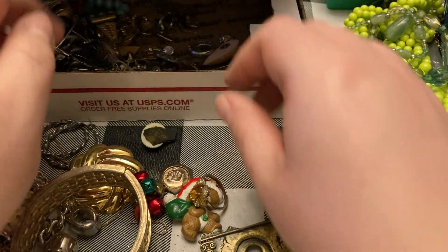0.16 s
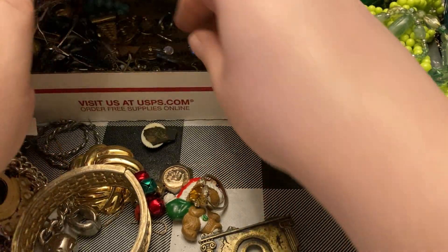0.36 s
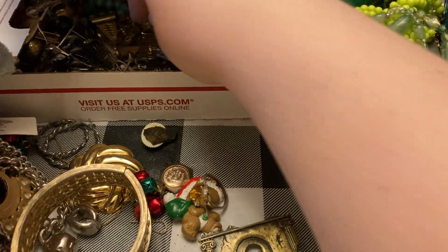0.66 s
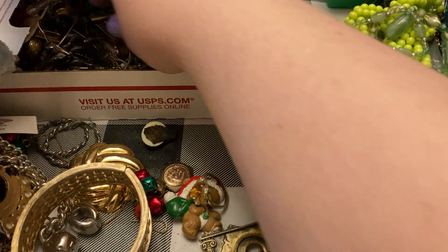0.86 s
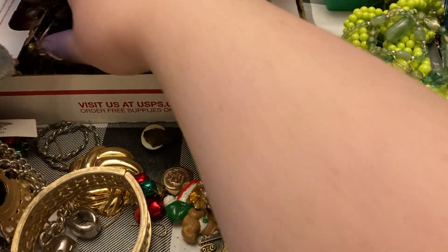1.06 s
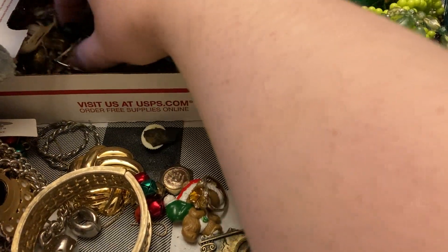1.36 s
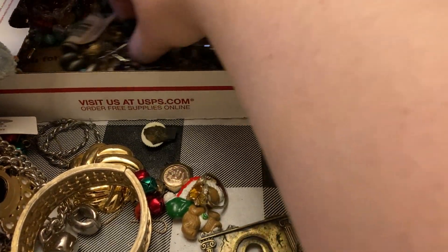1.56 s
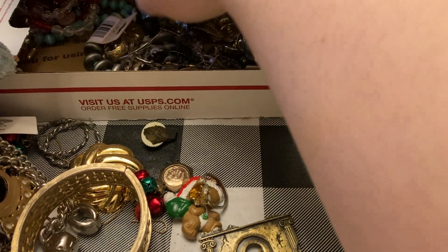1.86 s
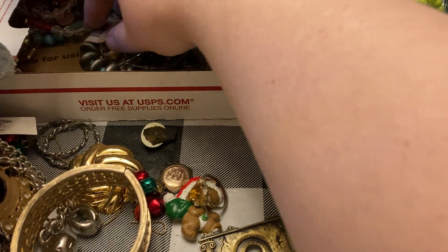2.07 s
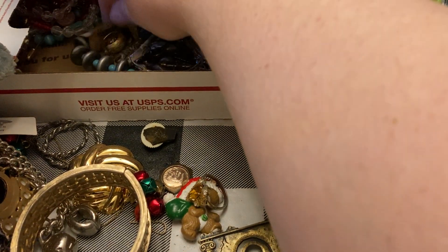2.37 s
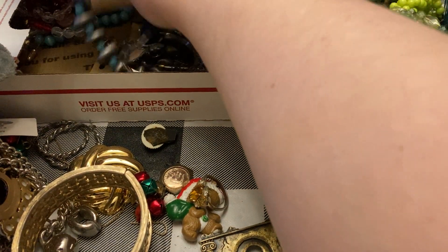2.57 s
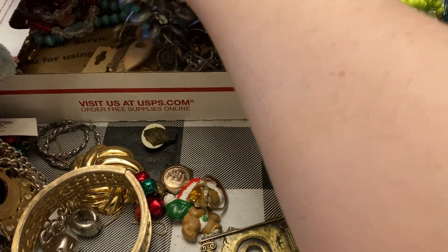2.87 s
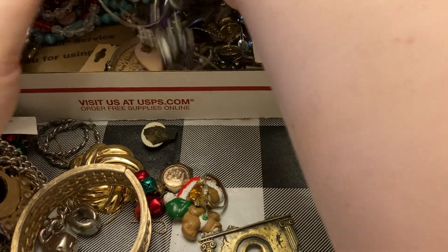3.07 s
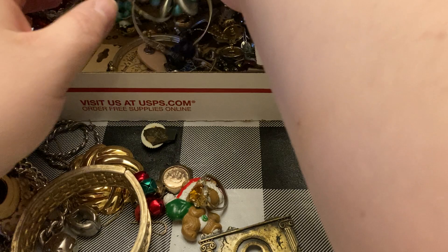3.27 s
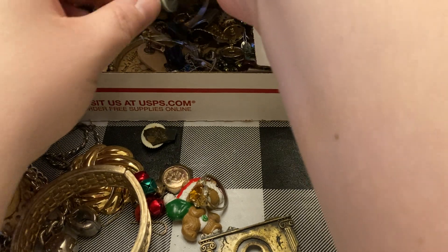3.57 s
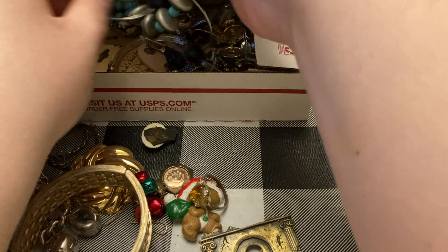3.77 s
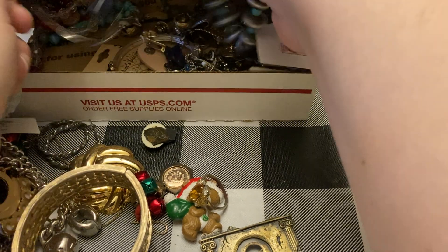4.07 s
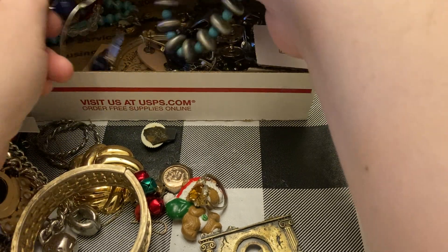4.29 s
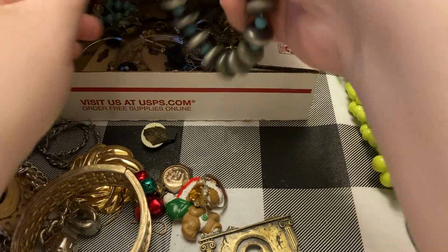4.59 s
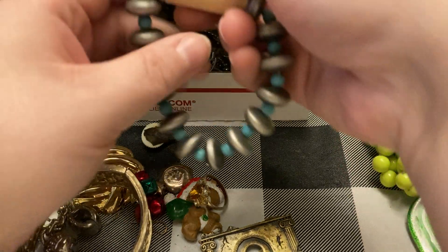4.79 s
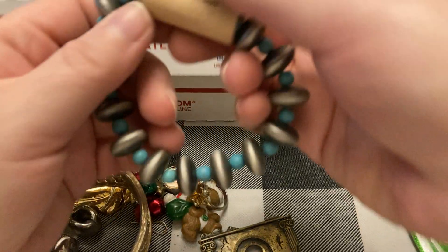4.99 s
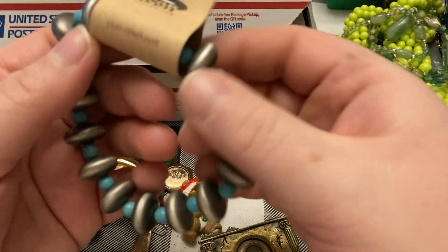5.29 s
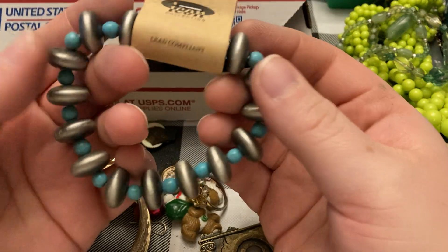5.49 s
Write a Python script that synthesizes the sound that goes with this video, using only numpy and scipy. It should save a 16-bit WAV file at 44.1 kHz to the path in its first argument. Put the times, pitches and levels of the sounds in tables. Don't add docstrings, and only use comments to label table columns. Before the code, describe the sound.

A phone close to a table, in a quiet room with faint low hum. At about 0.25 s a dull bump of the table and a brush of skin on cardboard, then soft rubbing until 0.8 s. The hand dives into a cardboard box of beads, chains and tags: clicks and scrapes thicken, with a strong rush of sliding pieces around 1.2 to 1.7 s. Hollow cardboard tocks stand out near 1.8 and 2.0 s. From 2.0 to 3.0 s there is a steady, glittering stir of clacks, link snaps and tiny high rings. The sharpest clatter lands near 3.1 s. From 3.3 s a loose disc chatters ever faster to rest while the digging thins. A knock and thump at 4.1 to 4.2 s lead to another rattling burst at 4.4 to 4.7 s. After 5 s only light touches remain, beads turning faintly in the fingers until 5.6 s.

```python
import sys
import numpy as np
from scipy import signal
from scipy.fft import rfft, irfft, next_fast_len
from scipy.io import wavfile
from scipy.ndimage import uniform_filter1d, map_coordinates

SR = 44100
rng = np.random.default_rng(int(sys.argv[2]) if len(sys.argv) > 2 else 0)


def wav_record(signal):
    frames = np.transpose(np.atleast_2d(signal))
    bounded = np.clip(frames, -1, 1)
    quanta = np.round(bounded * 32767).astype(np.int16)
    wavfile.write(sys.argv[1], SR, quanta)


def volts_from_decibels(level):
    exponent = np.asarray(level, float) / 20
    return 10 ** exponent


N = 248812
PALM_OFF_S = 0.84

# (frequency [Hz], rms level [dB])
HUM = [(119.5, -59.5)]
# (time [s], level [dB])
ROOM_FADE = [
    (0, 3),
    (5.0, -1.5),
    (5.3, -4.5),
    (5.64, -9.5),
]
# (time [s], peak [dB], sway [dB], slap [dB], slap pitch [Hz])
THUMPS = [(0.256, -17, -9, -27, 497), (0.493, -42.5, -5, 14, 384), (0.74, -35, -33, -32, 213),
          (1.235, -34.5, -7, -6, 490), (2.564, -30, 5, 19.5, 297), (2.6705, -25.5, -3.5, 13.5, 274),
          (3.143, -25.5, -16, 11.5, 400), (3.454, -41.5, -13, 15.5, 250), (4.101, -23.5, -20, -1, 413),
          (4.203, -37.5, -31, 16, 286), (5.02, -35, -34, 5, 210)]
# (time [s], peak [dB], pitch [Hz], decay t60 [s])
KNOCKS = [(0.26, -21, 478, 0.0042), (0.933, -24.5, 835, 0.0083), (1.141, -34, 885, 0.0054),
          (1.158, -22.5, 780, 0.0075), (1.233, -40, 385, 0.0088), (1.229, -26, 950, 0.0093),
          (1.327, -29, 970, 0.02), (1.473, -21, 1060, 0.0053), (1.781, -18.5, 826, 0.0051),
          (1.937, -9, 876, 0.006), (1.988, -10.5, 907, 0.0054), (2.566, -23.5, 402, 0.021),
          (2.731, -32, 920, 0.008), (2.84, -29.5, 938, 0.014), (2.862, -26.5, 880, 0.011),
          (2.958, -33.5, 500, 0.0088), (3.019, -25, 806, 0.0018), (3.065, -25.5, 870, 0.0072),
          (3.089, -21.5, 764, 0.0029), (3.118, -28.5, 870, 0.017), (3.143, -22, 830, 0.0024),
          (3.194, -33.5, 795, 0.017), (3.216, -21.5, 920, 0.0093), (3.283, -23.5, 934, 0.0038),
          (3.454, -24, 1100, 0.0045), (4.088, -22.5, 767, 0.012), (4.097, -27, 1200, 0.0093),
          (4.095, -18, 833, 0.033), (4.205, -17, 880, 0.01), (4.694, -25.5, 1170, 0.0029)]
# (frequency [Hz], width [Hz], level [dB])
BOX_MODES = [(459, 144, 1.5), (892, 186, 4.5), (1390, 830, -5)]
# (frequency [Hz], level [dB])
DISC_PARTIALS = [(3550, -2.5), (4500, 0), (6800, 3)]
# (frequency [Hz], width [Hz], level [dB])
PALM_MODES = [(1580, 160, -1), (2180, 130, -4), (2620, 120, -2), (4250, 200, -3), (5170, 100, -11)]
# (frequency [Hz], level [dB])
BEAD_TONE = [(1200, -8), (1700, -2.5), (2500, 5), (3050, 2.5), (3950, 4.5), (5500, -5), (7000, -21.5)]
# (frequency [Hz], level [dB])
CHAIN_TONE = [(4500, -38), (6000, -1), (8500, -2.5), (10500, -1.5), (13000, -11.5), (15700, -16),
              (16200, -43)]
# (time [s], peak [dB], sparkle over it [dB],
# pitch [Hz])
LINK_SNAPS = [(0.6799, -53, -14, 4290), (0.854, -39, -3, 2200), (0.8763, -31, -3, 3530),
              (0.9908, -42, -7, 1570), (1.1078, -39, -8, 1870), (1.1812, -33, -14, 2090),
              (1.234, -23, -4, 2430), (1.2563, -33, 4, 2500), (1.3911, -25, -12, 2500),
              (1.475, -23, -9, 2650), (1.6998, -30, 0, 1570), (1.7229, -35, 0, 2760),
              (1.7895, -31, 0, 3380), (2.0407, -45, 7, 3730), (2.0837, -43, 5, 2330),
              (2.1099, -42, 2, 4090), (2.1769, -37, 3, 3360), (2.1898, -39, 9, 2630),
              (2.2059, -37, -4, 2800), (2.2301, -29, -4, 4670), (2.2819, -38, 1, 3900),
              (2.322, -29, -5, 4520), (2.33, -30, -9, 2350), (2.4188, -33, -4, 2690), (2.428, -40, 6, 6220),
              (2.4435, -34, -8, 2760), (2.494, -33, -1, 2540), (2.6146, -45, 8, 4110),
              (2.6827, -34, -9, 2710), (2.7487, -32, -11, 4330), (2.8468, -31, 3, 4690),
              (2.889, -41, 6, 5210), (2.9108, -35, -8, 3680), (2.9378, -45, 4, 3700),
              (2.9599, -32, -3, 3680), (3.043, -42, 8, 3790), (3.0797, -35, 2, 4110),
              (4.0872, -44, 7, 3450), (4.111, -39, -5, 1960), (4.5562, -39, 2, 6090),
              (4.618, -38, -1, 4050), (4.626, -37, -4, 3980), (4.7065, -34, -7, 3510),
              (4.7181, -38, -4, 2910), (4.7705, -48, -9, 1740), (4.8594, -46, -9, 3850),
              (4.8754, -52, 3, 1810), (4.9054, -51, 4, 3880), (5.1088, -58, -11, 1770),
              (5.1622, -50, -7, 4460),
              (3.110, -31, -2, 2400), (3.131, -24, -6, 2300), (3.177, -27, -8, 2100),
                  (3.241, -36, -6, 2500), (3.301, -36, 0, 4500), (3.328, -50, 9, 4000),
                  (3.342, -50, 9, 4200), (3.361, -48, 8, 4000), (3.378, -48, 7, 4300),
                  (3.441, -46, 6, 4300), (3.468, -42, -8, 2000), (3.492, -48, 6, 4300),
                  (0.35, -52, -8, 2400), (0.55, -52, -10, 1700), (0.575, -52, -10, 1600)]
# (time [s], peak [dB], pitch [Hz], decay t60 [s])
PINGS = [(2.951, -33, 10800, .03), (3.005, -22, 10600, .05), (2.866, -38, 10300, .06),
         (2.050, -24, 11700, .012), (2.189, -30, 11500, .012), (2.65, -40, 6200, .05),
         (3.024, -38, 6200, .03), (2.481, -34, 2550, .05), (2.529, -28, 7950, .015),
         (4.206, -34, 1895, .07), (4.204, -24, 1300, .008), (4.098, -23, 420, .064),
         (4.098, -33, 1750, .03), (4.469, -34, 2490, .04), (1.794, -29, 900, .02), (3.301, -33, 900, .015),
         (0.263, -35, 600, .035), (1.68, -24, 1100, .04), (4.54, -32, 700, .03), (4.359, -30, 2560, .025),
         (4.422, -28, 8200, .015), (4.528, -34, 6000, .07), (4.421, -30, 900, .02), (4.658, -33, 600, .03),
         (4.707, -33, 1000, .03), (4.858, -47, 1000, .02), (4.878, -41, 950, .03), (4.905, -42, 1000, .03),
         (5.019, -41, 700, .03), (5.07, -44, 1000, .04), (1.695, -22, 1000, .03), (1.939, -24, 560, .025),
         (1.229, -22, 2100, .015), (0.991, -36, 800, .02), (5.233, -48, 7500, .012), (0.49, -40, 650, .03),
         (3.041, -32, 800, .015), (2.205, -32, 900, .02)]
# (time [s], peak [dB], sparkle [dB], ring pitch [Hz])
TICKS = [(0.2591, -37.5, -49, 1680), (0.8657, -30, -35, 3710), (1.159, -20, -44, 2190),
         (1.2377, -23, -33, 1940), (2.0511, -27.5, -28.5, 3350), (2.168, -32, -37, 3300),
         (2.2943, -20.5, -35, 4630), (2.3891, -24, -32, 2500), (2.4648, -33.5, -34, 2510),
         (2.5289, -23, -30, 3530), (2.702, -32, -36, 2880), (2.7262, -25.5, -46, 4100),
         (2.7931, -48, -36, 2570), (2.8626, -19, -40.5, 3500), (2.949, -29, -31, 5100),
         (2.9881, -29, -38, 2560), (3.0052, -34, -29, 3460), (3.1399, -11.5, -57, 2020),
         (3.1968, -23, -42.5, 2370), (3.2834, -22, -39, 3430), (3.6208, -37, -43.5, 1880),
         (3.6626, -45, -36.5, 4130), (3.8208, -36.5, -38.5, 5060), (3.9228, -35.5, -34, 4270),
         (4.1607, -43, -40, 3810), (4.2048, -28.5, -44, 1680), (4.4698, -31, -40, 2490),
         (4.594, -14, -29, 3750), (4.6955, -17, -38.5, 2860)]
# (time [s], peak [dB], sparkle [dB], ring pitch [Hz])
CLACKS = [(0.2967, -30, -43, 2300), (0.8425, -36.5, -60, 3860), (0.932, -31.5, -39.5, 3440),
          (1.0779, -36.5, -48, 2550), (1.289, -26, -43, 2140), (1.4132, -16, -25.5, 3400),
          (1.466, -16, -38.5, 3870), (1.6932, -16.5, -42.5, 1550), (1.7506, -28, -47.5, 3360),
          (1.937, -18.5, -44, 3930), (1.9881, -20, -39, 2330), (2.122, -37, -38.5, 3300),
          (2.2204, -22.5, -41.5, 2730), (2.414, -30, -38.5, 2750), (2.481, -28, -32.5, 2570),
          (2.6329, -33, -40, 3350), (2.7533, -26, -58, 4580), (3.024, -19.5, -33, 3800),
          (3.1284, -20.5, -37.5, 2020), (3.2167, -22.5, -41, 3670), (3.4195, -31.5, -56.5, 3120),
          (3.454, -29, -55, 1783), (3.8114, -44, -41, 5500), (3.9543, -27.5, -28.5, 4450),
          (4.096, -43.5, -37, 1650), (4.3795, -17, -35, 2410), (4.6556, -32, -42, 1880),
          (5.2325, -48.5, -54.5, 4780),
          (5.272, -47.5, -76, 2710),
    (5.485, -54, -64.5, 2590),
    (5.5582, -56, -68, 2520),
]
# (time [s], peak [dB], sparkle [dB], ring pitch [Hz])
SCUFFS = [(0.8954, -30, -37, 3580), (0.9812, -34, -49, 3560), (1.0932, -32, -45.5, 1810),
          (1.1412, -23.5, -48, 2000), (1.2237, -25, -54, 2030), (1.328, -19, -33, 2560),
          (1.7814, -24, -36, 3400), (2.019, -33, -47, 2600), (2.3149, -24.5, -34, 4640),
          (2.5815, -29, -40.5, 2700), (2.7736, -42, -40, 5600), (2.8389, -19, -28.5, 3640),
          (3.0663, -22, -32.5, 4070), (3.1173, -9.5, -27, 2360), (3.1534, -17, -30, 2320),
          (3.1614, -20, -29, 3890), (3.1698, -18.5, -44, 1920), (3.627, -36, -38.5, 2970),
          (3.7589, -44, -44.5, 4080), (4.3573, -22.5, -33, 2580), (4.4083, -37, -53, 3720),
          (4.4193, -17.5, -31, 2580), (4.4324, -28, -35, 4400), (4.5101, -22.5, -53, 2660),
          (4.5249, -21.5, -47, 2440), (4.543, -30, -42, 4830), (5.1384, -33, -46, 2730)]
# (time [s], effort [dB], pressure on the cardboard [dB])
EFFORT = [(0.019, -44, 3), (0.044, -67, -1.5), (0.836, -67, -1.5), (0.849, -47, 4.5), (1.03, -55.5, 6),
          (1.539, -29.5, 0), (1.699, -37, 9.5), (1.759, -50.5, 8), (1.92, -71.5, -2), (2.0, -51.5, 5),
          (2.269, -44.5, -12), (3.05, -47.5, 0), (3.38, -58.5, 3), (4.33, -68.5, -10), (4.43, -51.5, -3.5),
          (4.71, -48.5, 3.5), (5.05, -71.5, 7.5), (5.64, -85.5, -7)]
# (peak time [s], fade, or minus the swell of a drag that stops short [s],
# beads [dB], cardboard over beads [dB], chains over beads [dB])
SHOVES = [(0.12, -0.12, -60, -12, -6), (0.165, -0.066, -53.5, 2, -2), (0.352, .06, -60, -4, -4),
          (0.57, -0.12, -59, -3, -8), (4.125, .1, -66, -10, 13), (5.075, .05, -66, 17, -8),
          (3.4, .3, -70, -10, 14), (0.282, .1, -60, 12.5, 6.5), (0.492, -0.078, -50, 5.5, -3.5),
          (.745, -0.098, -54.5, -1, -6), (1.237, 0.023, -32.5, 10.5, -2.5), (1.29, 0.32, -42.5, 6, -1),
          (1.797, 0.028, -40, 5.5, 1.5), (1.942, 0.047, -73, 21.5, -10), (2.006, 0.16, -60.5, 21.5, -6.5),
          (2.215, 0.065, -43.5, 6, 7.5), (2.854, 0.044, -44, -1.5, 7), (3.14, 0.13, -39, 6.5, 1),
          (3.296, 0.041, -51, 13.5, 11), (3.66, -0.098, -47.5, -39, -5), (3.75, 0.48, -57.5, -29.5, -1.5),
          (4.065, -0.36, -59, -0.5, 3.5), (4.103, 0.063, -66.5, 31, 16), (4.212, 0.15, -60.5, 10, 6),
          (4.425, 0.078, -38.5, -3, -0.5), (4.528, 0.13, -42.5, 4, 4.5), (4.959, -0.15, -57, 2.5, 2.5),
          (5.03, .1, -76, 26.5, -11), (5.154, 0.076, -60.5, -2, 0), (5.42, -0.23, -66, -8, 8)]
# (frequency [Hz], likeness [0-1])
PORT_LIKENESS = [(100, .985), (1000, .86), (1800, .68), (2800, .5), (4300, .75), (5400, .35), (7800, .88),
                 (16000, .9)]
# (frequency [Hz], left minus right [dB])
PORT_BALANCE = [(200, 1), (700, .8), (1300, -3.3), (2800, -3.3), (4200, 0), (5500, 2.5), (7000, 0)]
# (frequency [Hz], right leads by [rad])
PORT_LEAD = [(0, 0), (1500, 0), (3100, 1.7), (4200, .4), (5000, .6), (6400, 3.1), (8150, 0), (16300, -15.7)]


def unit(x):
    return x / np.sqrt(np.mean(x ** 2) + 1e-20)


def along(points, hz):
    f, v = np.transpose(points)
    return np.interp(np.log(hz + 1), np.log(f + 1), v)


def curves(rows):
    s, *cols = np.transpose(rows)
    return [np.interp(np.arange(N) / SR, s, c) for c in cols]


def wobble(rate):
    knots = rng.standard_normal(int(N * rate / SR) + 4)
    return map_coordinates(knots, [np.arange(N) * rate / SR])


def filtered(x, response):
    m = next_fast_len(N + 8192)
    return irfft(rfft(x, m) * response(np.fft.rfftfreq(m, 1 / SR)), m)[..., :N]


def modes(rows):
    def response(f):
        return sum((-1) ** k * volts_from_decibels(db) * 1j * f * width / (hz * hz - f * f + 1j * f * width)
                   for k, (hz, width, db) in enumerate(rows))
    return response


def bead_tone(f):
    return volts_from_decibels(along(BEAD_TONE, f))


def chain_tone(f):
    return volts_from_decibels(along(CHAIN_TONE, f))


def hiss(response, patchy_db=0):
    noise = rng.standard_normal((2, N))
    if patchy_db:
        field = rng.standard_normal((257, -(-N // 256) + 1))
        field = uniform_filter1d(uniform_filter1d(field, 3, 0), 12, 1)
        bands = signal.stft(noise, nperseg=512)[2] * volts_from_decibels(patchy_db * unit(field))
        noise = signal.istft(bands, nperseg=512)[1][:, :N]
    return unit(filtered(noise, response))


def swell(t, t60, rise):
    return (1 - np.exp(-(t / rise) ** 2)) * volts_from_decibels(-60 * np.clip(t - rise, 0, None) / t60)


def strike(hz, t60, rise, t):
    phase = np.array([[0], [rng.uniform(0, 2 * np.pi)]])
    return swell(t, t60, rise) * np.sin(2 * np.pi * hz * t + phase)


def add(track, s, burst):
    part = track[:, max(round(s * SR), 0):][:, :burst.shape[1]]
    part += burst[:, :part.shape[1]]


def room(effort_db):
    rumble_db, tremble_db = -61.5, -25
    calm_db = curves(ROOM_FADE)[0]
    t = np.arange(N) / SR
    hum = 0
    for hz, db in HUM:
        level = np.sqrt(2) * volts_from_decibels(db + 3 * wobble(9))
        hum = hum + level * np.sin(2 * np.pi * hz * t + 1.3 * wobble(7))
    rumble = volts_from_decibels(rumble_db + 3 * wobble(4)) * hiss(modes([(72, 72, 0)]))
    tremble = volts_from_decibels(effort_db + tremble_db) * hiss(modes([(210, 26, 0)]))
    return volts_from_decibels(calm_db) * (hum * [[1], [0]] + rumble) + tremble


def thumps():
    t = np.arange(SR // 4) / SR
    out, shake = np.zeros((2, 2, N))
    t60 = 0.19
    for s, db, sway_db, slap_db, slap_hz in THUMPS:
        slap = strike(slap_hz, 0.016, 0.0049, t)
        boom = strike(130.3, 0.5 * t60, 0.0026, t) + 0.52 * strike(200, 0.68 * t60, 0.0061, t)
        sway = strike(85.8, 0.56 * t60, 0.0043, t) + 0.37 * strike(67.5, t60, 0.0092, t)
        add(out, s - 0.001, volts_from_decibels(db + slap_db - 5.5) * slap)
        add(shake, s + 0.009, volts_from_decibels(db + slap_db - 21.5) * swell(t, 0.094, 0.0073) * [[1], [1]])
        add(out, s + 0.004, volts_from_decibels(db - 5.5) * boom)
        add(out, s + 0.0091, volts_from_decibels(db + sway_db + 5) * sway)
    return out + shake * hiss(modes([(348, 250, 0)]))


def knocks():
    t = np.arange(SR // 10) / SR
    tock, mutter = np.zeros((2, 2, N))
    for s, db, hz, t60 in KNOCKS:
        swing = strike(hz, t60, 0.0028, t)
        swing = swing + 0.28 * strike(0.54 * hz, 1.32 * t60, 0.0038, t)
        swing = swing + 0.098 * strike(2.3 * hz, t60, 0.00038, t)
        add(tock, s - 0.0012, volts_from_decibels(db + 4) * swing)
        add(mutter, s, volts_from_decibels(db - 15) * swell(t, 0.051, 0.0043) * [[1], [1]])
    return tock + mutter * hiss(modes(BOX_MODES))


def disc():
    start_s, first_gap_s, shrink = 3.339, 0.0372, 0.895
    peak_db, loss_db, t60 = -38.5, 1.1, 0.015
    out, t = np.zeros((2, N)), np.arange(SR // 40) / SR
    for k in range(14):
        ring = sum(volts_from_decibels(db + rng.normal(0, 2.3)) * strike(hz, t60, 0.00055, t) for hz, db in DISC_PARTIALS)
        bounce_s = start_s + first_gap_s * (1 - shrink ** k) / (1 - shrink)
        add(out, bounce_s, volts_from_decibels(peak_db - loss_db * k) * ring)
    return out


def palm(bead_db):
    over_beads_db, drowned_above_db = -2, -52
    level_db = bead_db + over_beads_db - np.clip(bead_db - drowned_above_db, 0, None) + 3.5 * wobble(25)
    on_flap = np.arange(N) < PALM_OFF_S * SR
    return on_flap * volts_from_decibels(level_db) * hiss(modes(PALM_MODES))


def links():
    t60, rise, ping_rise = 0.008, 0.0007, 0.0009
    t = np.arange(SR // 20) / SR
    crack, sparkle, ring = np.zeros((3, 2, N))
    shape = swell(t, t60, rise) * [[1], [1]]
    for s, db, sparkle_db, hz in LINK_SNAPS:
        add(crack, s - rise, volts_from_decibels(db - 3.5) * shape)
        add(sparkle, s - rise, volts_from_decibels(db + sparkle_db - 1.5) * shape)
        add(ring, s - rise, volts_from_decibels(db - 3) * strike(hz, 1.6 * t60, rise, t))
    for s, db, hz, ping_t60 in PINGS:
        add(ring, s - ping_rise, volts_from_decibels(db) * strike(hz, ping_t60, ping_rise, t))
    return crack * hiss(bead_tone) + sparkle * hiss(chain_tone) + ring


def clicks():
    lead = 0.0079
    t = np.arange(SR // 20) / SR
    crack, sparkle, ring = np.zeros((3, 2, N))
    kinds = ((TICKS, 0.0055, -3, 9),  # events, t60 [s], crack [dB], sparkle [dB]
             (CLACKS, 0.014, -6, 7),
             (SCUFFS, 0.022, -7, 5))
    for rows, t60, crack_gain_db, sparkle_gain_db in kinds:
        rise = 0.0008 + 0.1 * t60
        hit = swell(np.clip(t - lead, 0, None), t60, rise)
        scrape = 0.082 * swell(t, 0.12, lead)
        shape = (hit + scrape) * [[1], [1]]
        for s, db, sparkle_db, hz in rows:
            crack_level = volts_from_decibels(db + crack_gain_db)
            sparkle_level = volts_from_decibels(sparkle_db + sparkle_gain_db)
            add(crack, s - rise - lead, crack_level * shape)
            add(sparkle, s - rise - lead, sparkle_level * shape)
            add(ring, s - rise, volts_from_decibels(-2) * crack_level * strike(hz, 1.8 * t60, rise, t))
            link_rings = sum(strike(f, 1.4 * t60, rise, t) for f in rng.uniform(5000, 15000, 3))
            add(ring, s - rise, volts_from_decibels(-9) * sparkle_level * link_rings)
    return crack * hiss(bead_tone, patchy_db=2) + sparkle * hiss(chain_tone, patchy_db=2) + ring


def stirring():
    chain_under_db = -3.5
    drop_db, edge = 21, 0.49
    t = np.arange(0, N / SR + 0.002, 0.001)
    s, effort_db, press_db = np.transpose(EFFORT)
    offsets_db = np.array([np.interp(t, s, press_db), 0 * t, 0 * t + chain_under_db])
    power = volts_from_decibels(2 * (np.interp(t, s, effort_db) + offsets_db))
    for peak, fade, db, box_db, chain_db in SHOVES:
        away = np.maximum((t - peak) / fade, (peak - t) / (edge * fade)) ** 1.13
        power = power + volts_from_decibels(2 * (db - drop_db * away + np.array([[box_db], [0], [chain_db]])))
    return curves(np.transpose([t, *(10 * np.log10(power))]))


def grit(rate, spread_db, t60, blur):
    size = volts_from_decibels(2 * spread_db * rng.exponential(1, N).clip(0, 3))
    hit = (rng.random(N) < rate / SR) * size
    power = signal.lfilter([1], [1, -volts_from_decibels(-120 / (t60 * SR))], hit)
    return np.sqrt(np.abs(uniform_filter1d(power, max(round(blur * SR), 1))))


def tinkle(rate, life):
    draw, t = rng.random((int(rate * N / SR), 4)), np.arange(480) / SR
    hz = 1500 * 8 ** draw[:, 1:2]
    size = volts_from_decibels(-5 * np.log(draw[:, 2:3] + 0.012)) * np.exp(-t * np.sqrt(hz * 4000) / life)
    at = ((draw[:, :1] * N).astype(int) + np.arange(len(t))).ravel()
    rings = [size * np.sin(2 * np.pi * (hz * t + k * draw[:, 3:])) for k in (0, 1)]
    return unit(np.array([np.bincount(at, r.ravel(), N)[:N] for r in rings]))


def rummage(box_db, bead_db, chain_db):
    rush = 2.8 * np.clip((bead_db + 45.5) / 12, 0, 1)
    brush = 1.5 * (uniform_filter1d(bead_db, SR // 4) < -58)
    steady = 0.45 + rush + brush
    contact = (steady + unit(grit(220, spread_db=2.5, t60=0.029, blur=0.002))) / (1 + steady)
    metal = tinkle(600, life=20)
    box = hiss(lambda f: modes(BOX_MODES)(f) * (f / (f + 400)), patchy_db=2.5)
    beads = hiss(bead_tone, patchy_db=3) + 0.25 * unit(filtered(metal, bead_tone))
    chain = hiss(chain_tone, patchy_db=4.5) + 0.58 * unit(filtered(metal, chain_tone))
    bead_db = bead_db + 0.8 - 3.5 * (np.arange(N) < PALM_OFF_S * SR)
    out = volts_from_decibels(box_db - 2) * unit(contact * box)
    out = out + volts_from_decibels(bead_db) * unit(contact * beads)
    return out + volts_from_decibels(chain_db + 1.5) * unit(contact * chain)


def scene():
    box_db, bead_db, chain_db = stirring()
    background = room(curves(EFFORT)[0]) + thumps() + knocks()
    pieces = disc() + palm(bead_db) + links() + clicks()
    return background + pieces + rummage(box_db, bead_db, chain_db)


def thin_treble(pair, margin_db, quiet_db):
    both = np.array([pair[0] + pair[1], pair[0] - pair[1]]) / 2
    hz, _, z = signal.stft(both, SR, nperseg=2048, noverlap=1024)
    bands = (np.abs(z[:, :1024]) ** 2).reshape(2, 32, 32, -1).mean(2)
    under_partner = bands < volts_from_decibels(2 * margin_db) * bands[::-1]
    under_loudest = bands < volts_from_decibels(2 * quiet_db) * bands[:, 2:].max((0, 1))
    weak = np.repeat(under_partner | under_loudest, 32, 1)
    z[:, :1024] *= 1 - weak * (hz[:1024, None] > 4800)
    mid, side = signal.istft(z, SR, nperseg=2048, noverlap=1024)[1][:, :N]
    return np.array([mid + side, mid - side])


def band_limit(x):
    return signal.sosfilt(signal.butter(12, 17030, fs=SR, output="sos"), x)


def record(dry):
    def spread(f):
        angle = np.arccos(np.clip(along(PORT_LIKENESS, f), 0, 1)) / 2
        return np.array([np.cos(angle), np.sin(angle)])

    def port_responses(f):
        lead = np.interp(f, *np.transpose(PORT_LEAD))
        phase = lead - 0.22 * np.sin(2 * lead)
        lag = np.exp(0.5j * phase) / volts_from_decibels(along(PORT_BALANCE, f) / 2)
        low_cut = f ** 2 / (f ** 2 + 45 ** 2)
        return np.array([1 / lag, lag]) * low_cut

    mid, side = filtered(dry, spread)
    ports = filtered(np.array([mid + side, mid - side]), port_responses)
    mix = thin_treble(ports, margin_db=-11.5, quiet_db=-25)
    return band_limit(mix)


dry = scene()
out = record(dry)
wav_record(out)
```